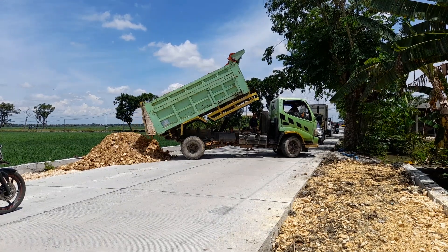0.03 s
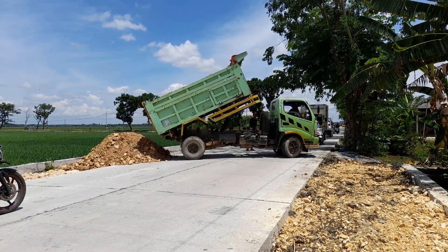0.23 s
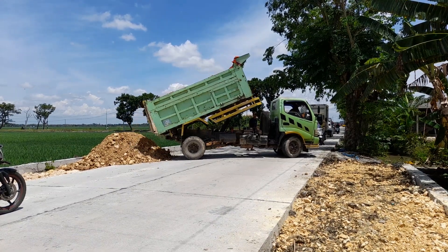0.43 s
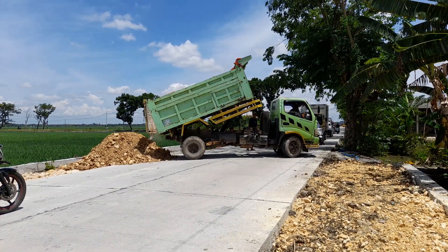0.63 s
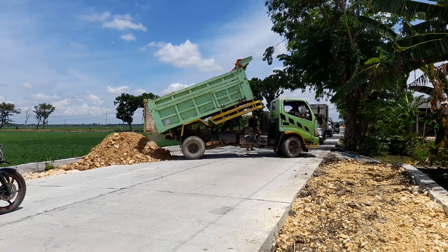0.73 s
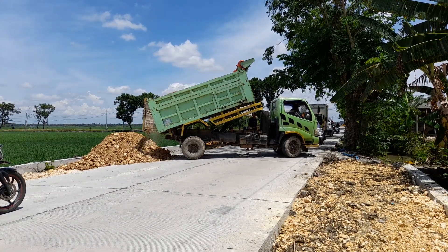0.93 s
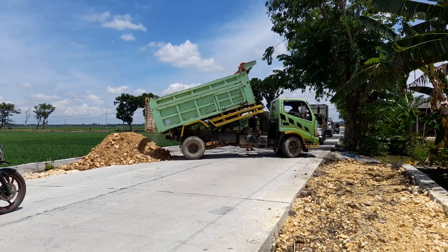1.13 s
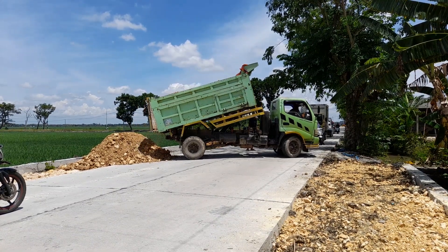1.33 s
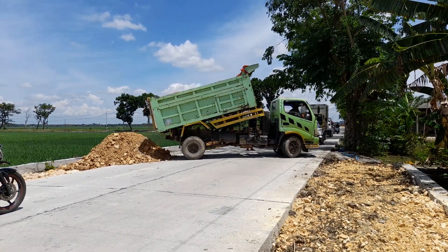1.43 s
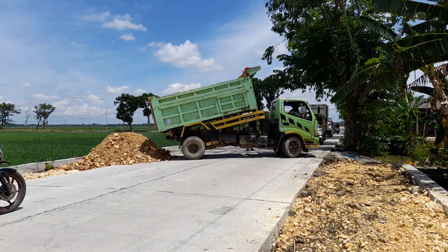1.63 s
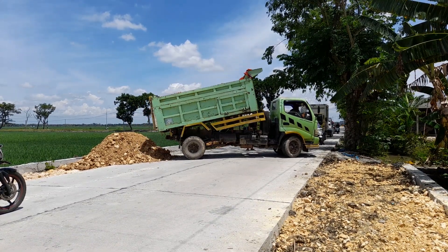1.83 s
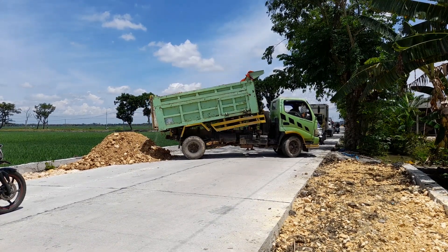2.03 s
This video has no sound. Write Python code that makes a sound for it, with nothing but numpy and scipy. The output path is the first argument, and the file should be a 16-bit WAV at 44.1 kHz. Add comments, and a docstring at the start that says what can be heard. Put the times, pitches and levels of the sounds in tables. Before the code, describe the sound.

Dump truck tailgate slams twice against its empty steel bed while the diesel engine idles

```python
"""First you hear a diesel dump truck idling some way off: noise pulsed by each firing, whir and rumble.
Its empty steel bed is coming down, and the hanging tailgate slams against it twice, near 0.3 s and 1.6 s.
Each slam is a quick cluster of contacts: decaying sine tones boom, fading noise clangs and cracks.
A clank, a scrape, a latch ping and two hinge squeaks join in, with stray knocks of the chassis.
Low noise flutters faintly at the right microphone port and swells into a puff of wind near 0.66 s."""
import sys
import numpy as np
from scipy import signal
from scipy.fft import rfft, irfft, next_fast_len
from scipy.io import wavfile
from scipy.ndimage import map_coordinates

SR = 44100
rng = np.random.default_rng(int(sys.argv[2]) if len(sys.argv) > 2 else 0)


def wav_out(sig):
    """Save sig, one row per channel (or a flat mono array), as 16-bit PCM at SR to the path in sys.argv[1]."""
    wavfile.write(sys.argv[1], SR, np.round(np.clip(np.atleast_2d(sig).T, -1, 1) * 32767).astype(np.int16))


N = 92610
T = np.arange(N) / SR  # time of every sample, in seconds

# Tailgate touching the bed:
# (time [s], boom [dB], boom tilt [dB per octave], clang [dB], crack [dB])
CONTACTS = [(.300, -43, 9.5, -21.5, -14), (.305, -12.5, 1, -18, -39), (.328, -23, 2, -20.5, -15),
            (.338, -14.5, -3, -26, -34), (.352, -30, -5.5, -24.5, -20), (.410, -42, 3, -30, -31),
            (.468, -29, -4.5, -36, -54), (.547, -48, 6, -33.5, -38), (1.612, -15, -3.5, -19, -18.5),
            (1.633, -19.5, 0, -19.5, -22.5), (1.670, -29.5, -1, -22, -30), (1.710, -22, -3.5, -25.5, -29),
            (1.755, -26.5, -5, -33.5, -33)]
# Ringing tones of the steel bed: (frequency [Hz], level [dB], time to fall 60 dB [s])
BED_MODES = [(125.3, -8.5, 1.155), (136.9, 0, 0.23), (201.2, -6.5, 0.49), (223.26, -6, 0.6),
             (266.7, -8, 0.44), (328, -7.5, 0.22), (362.4, -13.5, 0.54), (399.3, -12, 0.39),
             (427, -9, 0.43), (467.4, -3.5, 0.34), (567, -19, 0.77), (608, -21.5, 0.53), (724, -7, 0.2),
             (751, -19, .4), (844, -16.5, 0.58), (883, -15, 0.5), (985, -22, 0.23), (1041, -22, 0.2),
             (1375, -29, 0.29), (1444, -46, .45), (1670, -34, 0.78), (1725, -22, 0.34), (1879, -23, 0.38)]
BOOM_ATTACK_S, TILT_PIVOT_HZ = 0.001, 300
# Colour of the dense panel ring: (frequency [Hz], relative level [dB])
CLANG_COLOUR = [(50, -43), (110, 3), (220, -0.5), (450, -1.5), (800, -4.5), (1200, -10), (1800, -10),
                (2800, -15.5), (5000, -17.5), (8000, -23.5), (15000, -38)]
# How long the panels ring: (frequency [Hz], time to fall 60 dB [s])
CLANG_T60 = [(120, 1), (500, 0.43), (1500, 0.49), (4000, 0.64), (12000, 0.15)]
CLANG_ATTACK_S = 0.0015
# Colour of steel cracking on steel: (frequency [Hz], relative level [dB])
CRACK_COLOUR = [(400, -40), (1500, -2), (4000, 5), (6300, 0.5), (7800, 8.5), (9500, -13.5), (12000, -3),
                (15500, -22)]
CRACK_ATTACK_S, CRACK_T60_S = 0.0021, 0.051
CRACK_TAIL_DB, CRACK_TAIL_T60_S = -23, 0.82
CRACK_GRAIN_DB, CRACK_GRAIN_HZ = 2.5, 499
# How alike the gate sounds left and right: (frequency [Hz], likeness [-1 to 1])
GATE_ALIKE = [(100, 0.86), (700, 0.88), (1400, -0.084), (3000, -0.43), (7000, -0.12), (15000, -0.22)]
# Balance of the gate: (frequency [Hz], left minus right [dB])
GATE_BALANCE = [(100, -1.3), (400, 0), (1200, -4), (2400, 1), (4400, 4.5), (7000, 0.5), (14000, 2)]

# Whole face of the gate meeting the bed: (time [s], centre frequency [Hz], level [dB])
SLAMS = [(.302, 720, -10.5), (1.607, 201, -13.5)]
SLAM_WIDTH_OCTAVES, SLAM_ATTACK_S, SLAM_T60_S = 0.86, 0.0034, 0.12
# Gate scraping along its frame: (time [s], length [s], panel level [dB], gritty treble [dB])
SCRAPES = [(0.276, 0.023, -19.5, -48), (1.592, 0.017, -20, -31.5)]
SCRAPE_RELEASE_S, GRIT_ATTACK_S = 0.015, 0.0019
# Ringing tones of the latch: (frequency [Hz], level [dB])
LATCH_MODES = [(7600, -14), (8030, -18.5), (12400, -30)]
LATCH_TIME_S, LATCH_ATTACK_S, LATCH_T60_S = 0.3005, 0.001, 0.044
LATCH_LEFT_MINUS_RIGHT_DB = 7
# Hinge squeaks: (time [s], length [s], frequency [Hz], level [dB])
SQUEAKS = [(.523, .032, 6370, -42), (.537, .022, 4790, -42)]
SQUEAK_WAVER_HZ = 25

# Loudness of the engine over time: (time [s], level [dB])
ENGINE_LOUDNESS = [(0, 6), (.25, 6), (.55, 1.5), (.68, .5), (1.1, 0), (1.55, 0.5), (1.9, 3), (2.1, 2)]
FIRING_HZ, FIRST_FIRING_S = 20.58, 0.03335
TICK_RISE_S, TICK_FALL_S, TICK_SCATTER_DB, TICK_JITTER_S = 0.0031, 0.012, 2, 0.0015
# Colours of the engine's three noises: (frequency [Hz], relative level [dB])
CLATTER_COLOUR = [(250, 4.5), (700, 4.5), (1400, 5), (2600, -1), (4000, -3), (6200, -11), (7800, -3.5),
                  (9700, -26.5), (12000, -11), (15500, -27)]
WHIR_COLOUR = [(120, -26), (200, -2), (350, -10.5), (400, -6.5), (600, -8.5), (850, -11), (1450, -8),
               (1760, -18), (2250, -12.5), (3000, -15), (6200, -20), (7600, -17.5), (9500, -32.5),
               (12000, -26.5), (15500, -40)]
RUMBLE_COLOUR = [(20, -48), (33, -26), (48, 1.5), (70, 0), (95, -0.5), (120, -1), (170, -9), (230, -13),
                 (400, -28.5), (900, -60)]
# Levels before the loudness curve is applied
CLATTER_DB, WHIR_DB, RUMBLE_DB = -44, -41.5, -34.5
RUMBLE_FOLLOWS = 0.96  # share of the loudness curve, in dB, that rumble and exhaust follow
RUMBLE_SWELL_DB, RUMBLE_SWELL_HZ = 1, 14.7
# Narrow whines, before the loudness curve: (frequency [Hz], width [Hz], level [dB])
WHINES = [(1915, 29, -55), (2040, 60, -53), (2140, 17, -57), (3930, 50, -70)]
# Exhaust tones, before the loudness curve: (multiple of the firing rate, level [dB])
EXHAUST = [(3, -40.5), (4, -42.5), (6, -44)]
# How alike the engine sounds left and right: (frequency [Hz], likeness [-1 to 1])
ENGINE_ALIKE = [(60, 1), (250, 0.86), (600, 0.73), (1300, 0.086), (2500, 0.21), (5000, -0.19),
                (12000, 0.02)]
# Balance of the engine: (frequency [Hz], left minus right [dB])
ENGINE_BALANCE = [(80, -0.5), (600, -2), (1400, -2), (2000, -7), (2500, 3), (4500, 1), (7000, 1.5),
                  (14000, 0)]

# Stray knocks of the chassis: (time [s], level [dB])
KNOCKS = [(.038, -30), (.183, -33), (.762, -30), (.955, -33), (1.342, -31.5), (1.535, -32), (1.921, -30)]
# Colour of a knock: (frequency [Hz], relative level [dB])
KNOCK_COLOUR = [(300, -25), (900, -6), (1400, 8), (1800, -11), (2400, -6), (4000, -17), (9000, -27)]
KNOCK_ATTACK_S, KNOCK_T60_S = 0.0025, 0.048
# Wind on the right port: (time [s], level [dB])
PUFF = [(.6, -40), (.66, -22.5), (.72, -25.5), (.78, -32.5), (.93, -44), (1.0, -64)]
# Colour of the wind: (frequency [Hz], relative level [dB])
PUFF_COLOUR = [(30, -15), (90, 4), (140, 8.5), (210, -0.5), (330, -14.5), (900, -55)]

# Colour of the two microphone ports: (frequency [Hz], gain [dB])
LEFT_PORT = [(7000, 0), (7900, 1.5), (8600, 3), (9800, -1.5), (11400, 3), (13000, -2.5), (14500, -4)]
RIGHT_PORT = [(6500, 0), (7350, 3), (8000, -12.5), (8800, -5), (9800, -3), (11400, -4), (13000, -1),
              (14500, 0.5)]
LOW_CUT_HZ, TOP_HZ = 35, 15790


def amp(db):
    """Turn decibels into a gain."""
    return 10 ** (np.asarray(db) / 20)


def unit(x):
    """Scale a sound to an rms level of 1."""
    return x / np.sqrt(np.mean(x ** 2) + 1e-20)


def along(points, hz):
    """Read a (frequency, value) table between its points, on a log frequency axis."""
    f, v = np.transpose(points)
    return np.interp(np.log(hz + 1), np.log(f + 1), v)


def over_time(points):
    """Read a (time, value) table at every sample."""
    return np.interp(T, *np.transpose(points))


def filtered(x, response):
    """Multiply the spectrum of x by a gain that depends on frequency."""
    m = next_fast_len(x.shape[-1] + 8192)  # spare room so the end does not wrap onto the start
    spectrum = rfft(x, m) * response(np.fft.rfftfreq(m, 1 / SR))
    return irfft(spectrum, m)[..., :x.shape[-1]]


def balance(left_minus_right_db):
    """Share a level difference between left and right, half each."""
    return amp(np.array([[.5], [-.5]]) * left_minus_right_db)


def noise(colour, alike, pan, size=N):
    """Stereo noise of rms 1: a shared middle plus an opposed side sets how alike the channels are."""
    def middle_and_side(hz):
        turn = np.arccos(np.clip(along(alike, hz), -1, 1)) / 2
        return amp(along(colour, hz)) * [np.cos(turn), np.sin(turn)]

    mid, side = filtered(rng.standard_normal((2, size)), middle_and_side)
    stereo = np.array([mid + side, mid - side])
    return unit(filtered(stereo, lambda hz: balance(along(pan, hz))))


def gate_noise(colour, t):
    """Noise with the tailgate's width and balance, as long as t."""
    return noise(colour, GATE_ALIKE, GATE_BALANCE, size=len(t))


def fade(t, t60):
    """Exponential decay that falls 60 dB in t60 seconds."""
    return np.exp(-np.log(1000) * t / t60)


def rise(t, attack):
    """Soft start that climbs quickly, then levels off at 1."""
    return 1 - np.exp(-t / attack)


def wobble(rate):
    """Smooth curve through random points, rate points a second."""
    return map_coordinates(rng.standard_normal(2048), [T * rate], mode="wrap")


def add(track, s, sound):
    """Mix a sound into the track at time s."""
    part = track[:, round(s * SR):][:, :sound.shape[-1]]
    part += sound[..., :part.shape[1]]


def boom(t, tilt_db):
    """Steel bed ringing as decaying sines; a larger tilt favours its higher tones."""
    out = np.zeros((2, len(t)))
    for hz, db, t60 in BED_MODES:
        level_db = db + tilt_db * np.log2(hz / TILT_PIVOT_HZ)
        tone = np.sin(2 * np.pi * (hz * t + rng.random()))
        out += amp(level_db) * fade(t, t60) * balance(along(GATE_BALANCE, hz)) * tone
    return out * rise(t, BOOM_ATTACK_S)


def clang(t):
    """Countless panel tones heard as noise, each frequency band dying at its own speed."""
    hz, s, bands = signal.stft(gate_noise(CLANG_COLOUR, t), SR, nperseg=256)
    decay = fade(s, along(CLANG_T60, hz)[:, None])
    ring = signal.istft(bands * decay, SR)[1]
    return ring[:, :len(t)] * rise(t, CLANG_ATTACK_S)


def crack(t):
    """Bright noise of steel on steel, roughened by fast level changes, with a thin after-ring."""
    shape = fade(t, CRACK_T60_S) + amp(CRACK_TAIL_DB) * fade(t, CRACK_TAIL_T60_S)
    grain = unit(amp(CRACK_GRAIN_DB * wobble(CRACK_GRAIN_HZ)[:len(t)]))
    return gate_noise(CRACK_COLOUR, t) * grain * shape * rise(t, CRACK_ATTACK_S)


def tailgate():
    """Each contact sets off the bed's boom, the panels' clang and the crack of steel."""
    out, t = np.zeros((2, N)), np.arange(SR) / SR
    for s, boom_db, tilt_db, clang_db, crack_db in CONTACTS:
        add(out, s, amp(boom_db) * boom(t, tilt_db))
        add(out, s, amp(clang_db) * clang(t))
        add(out, s, amp(crack_db) * crack(t))
    return out


def slams():
    """The whole gate face meets the bed: a broad band of noise that dies quickly."""
    out, t = np.zeros((2, N)), np.arange(SR // 2) / SR
    for s, centre_hz, db in SLAMS:
        def bell(hz):
            octaves_away = np.log2((hz + 1) / centre_hz)
            return np.exp(-(octaves_away / SLAM_WIDTH_OCTAVES) ** 2)

        band = unit(filtered(gate_noise(CLANG_COLOUR, t), bell))
        add(out, s, amp(db) * band * rise(t, SLAM_ATTACK_S) * fade(t, SLAM_T60_S))
    return out


def scrapes():
    """Friction noise swells in the panels until the gate seats, then dies away."""
    out, t = np.zeros((2, N)), np.arange(SR // 8) / SR
    for s, length, db, grit_db in SCRAPES:
        swell = np.minimum(t / length, 1) ** 2
        panels = amp(db) * swell * gate_noise(CLANG_COLOUR, t)
        grit = amp(grit_db) * rise(t, GRIT_ATTACK_S) * gate_noise(CRACK_COLOUR, t)
        release = np.exp(-np.maximum(t - length, 0) / SCRAPE_RELEASE_S)
        add(out, s, (panels + grit) * release)
    return out


def latch():
    """Small steel parts ping at the first slam: short, high decaying sines."""
    out, t = np.zeros((2, N)), np.arange(SR // 8) / SR
    # each channel gets its own random phase
    ping = sum(amp(db) * np.sin(2 * np.pi * (hz * t + rng.random((2, 1)))) for hz, db in LATCH_MODES)
    shape = rise(t, LATCH_ATTACK_S) * fade(t, LATCH_T60_S)
    add(out, LATCH_TIME_S, ping * shape * balance(LATCH_LEFT_MINUS_RIGHT_DB))
    return out


def hinge():
    """The hinge squeaks as the gate swings back: brief sines with a wavering pitch."""
    out = np.zeros((2, N))
    for s, length, hz, db in SQUEAKS:
        swell = np.sin(np.pi * np.clip((T - s) / length, 0, 1))
        cycles = np.cumsum(hz + SQUEAK_WAVER_HZ * wobble(250)) / SR
        out += amp(db) * swell * np.sin(2 * np.pi * cycles) * balance(along(GATE_BALANCE, hz))
    return out


def firing_ticks():
    """One pulse per diesel firing, slightly uneven in time and strength."""
    ticks = np.zeros(N)
    for k, (late, size) in enumerate(rng.standard_normal((48, 2))):
        # k = 0 is the firing just before the sound starts
        firing_s = FIRST_FIRING_S + (k - 1) / FIRING_HZ + TICK_JITTER_S * late
        age = np.maximum(T - firing_s, 0)
        ticks += amp(TICK_SCATTER_DB * size) * rise(age, TICK_RISE_S) ** 2 * np.exp(-age / TICK_FALL_S)
    return unit(ticks)


def whine(hz, width):
    """A narrow band of noise around one pitch, independent left and right."""
    return unit(filtered(rng.standard_normal((2, N)), lambda f: np.exp(-((f - hz) / width) ** 2)))


def engine():
    """Diesel idle: clatter pulsed by the firings, steady whir and whines, low rumble and exhaust tones."""
    loud_db = over_time(ENGINE_LOUDNESS)
    clatter = amp(CLATTER_DB) * firing_ticks() * noise(CLATTER_COLOUR, ENGINE_ALIKE, ENGINE_BALANCE)
    whir = amp(WHIR_DB) * noise(WHIR_COLOUR, ENGINE_ALIKE, ENGINE_BALANCE)
    whines = sum(amp(db) * whine(hz, width) for hz, width, db in WHINES)
    swell = amp(RUMBLE_SWELL_DB * wobble(RUMBLE_SWELL_HZ))
    rumble = amp(RUMBLE_DB) * unit(swell * noise(RUMBLE_COLOUR, ENGINE_ALIKE, ENGINE_BALANCE))
    exhaust = sum(amp(db) * np.sin(2 * np.pi * (k * FIRING_HZ * T + rng.random())) for k, db in EXHAUST)
    upper = amp(loud_db) * (clatter + whir + whines)
    low = amp(RUMBLE_FOLLOWS * loud_db) * (rumble + exhaust)
    return upper + low


def chassis():
    """Loose parts knock now and then: short bursts of coloured noise."""
    out, t = np.zeros((2, N)), np.arange(SR // 10) / SR
    for s, db in KNOCKS:
        burst = noise(KNOCK_COLOUR, ENGINE_ALIKE, ENGINE_BALANCE, size=len(t))
        add(out, s, amp(db) * burst * rise(t, KNOCK_ATTACK_S) * fade(t, KNOCK_T60_S))
    return out


def wind():
    """Moving air flutters at the right port only: low noise with a level that swells and falls."""
    flutter = unit(filtered(rng.standard_normal(N), lambda hz: amp(along(PUFF_COLOUR, hz))))
    return np.array([np.zeros(N), flutter * amp(over_time(PUFF))])


def scene():
    """Sum the tailgate, the truck and the wind."""
    gate = tailgate() + slams() + scrapes() + latch() + hinge()
    return gate + engine() + chassis() + wind()


def record(dry):
    """Colour the treble at each port, cut the deepest bass, round off tall peaks, limit the band."""
    heard = filtered(dry, lambda hz: amp([along(LEFT_PORT, hz), along(RIGHT_PORT, hz)]))
    low_cut = signal.butter(N=4, Wn=LOW_CUT_HZ, btype="high", fs=SR, output="sos")
    heard = signal.sosfilt(low_cut, heard)
    rounded = heard / (1 + np.abs(heard) ** 8) ** (1 / 8)  # bends only near full scale
    return filtered(rounded, lambda hz: hz < TOP_HZ)


dry = scene()
out = record(dry)
wav_out(out)
```